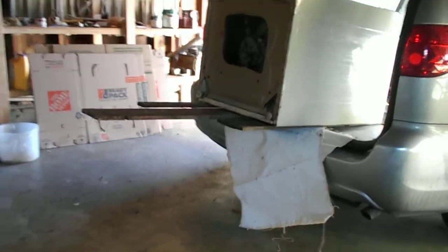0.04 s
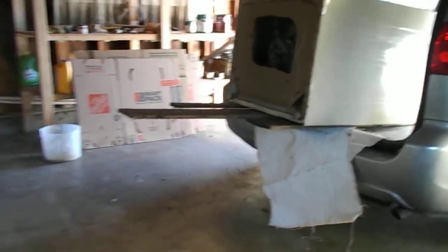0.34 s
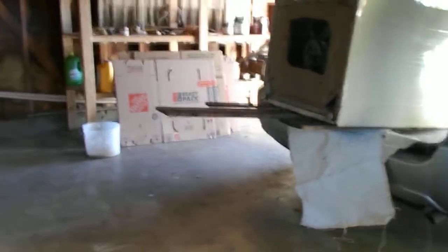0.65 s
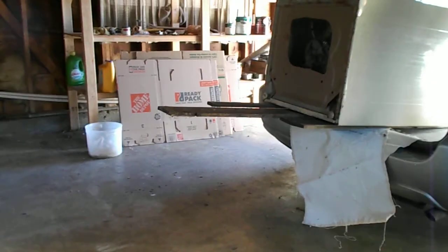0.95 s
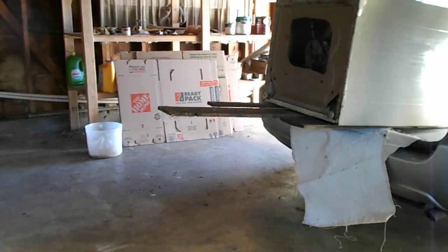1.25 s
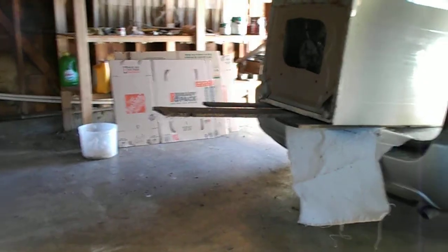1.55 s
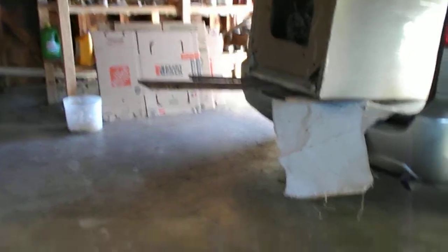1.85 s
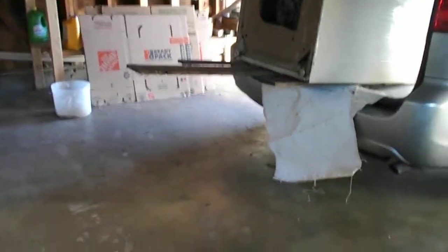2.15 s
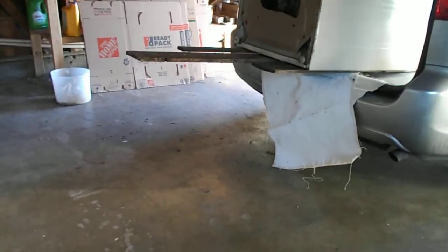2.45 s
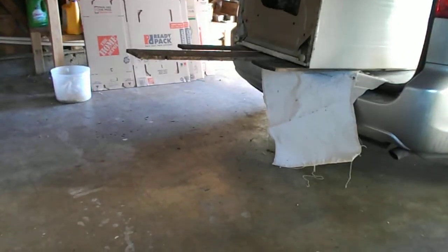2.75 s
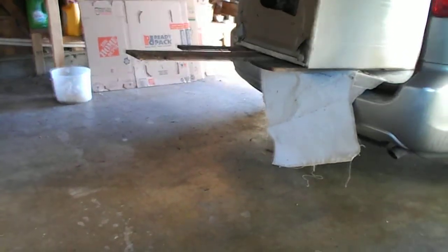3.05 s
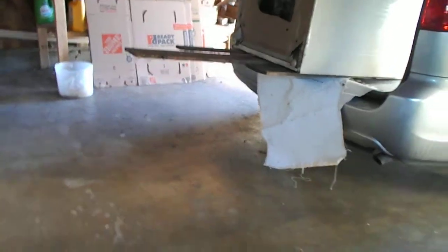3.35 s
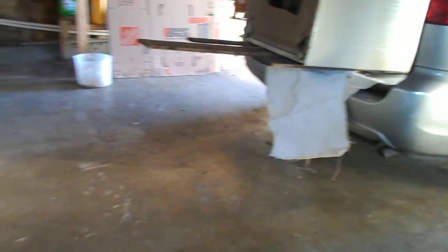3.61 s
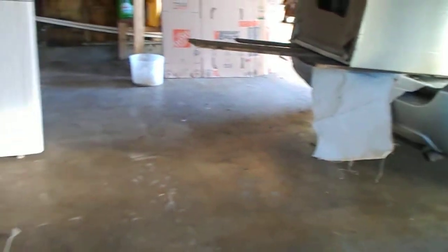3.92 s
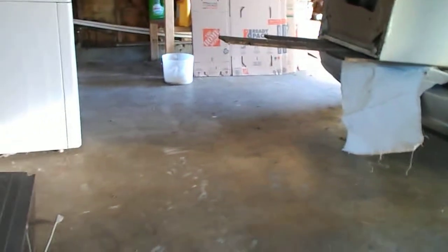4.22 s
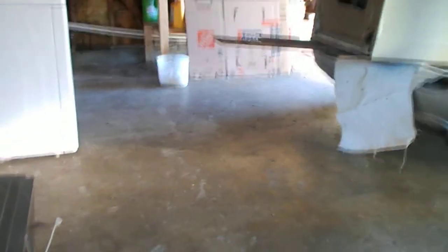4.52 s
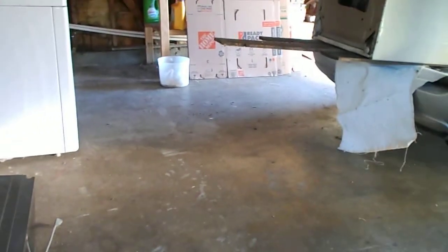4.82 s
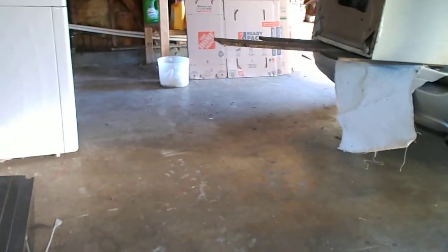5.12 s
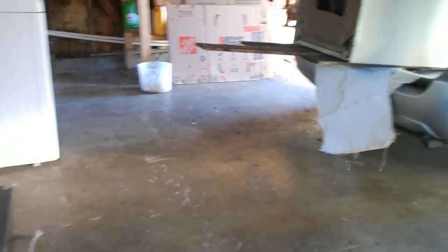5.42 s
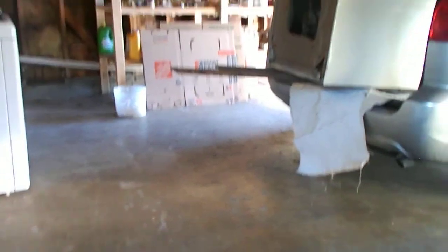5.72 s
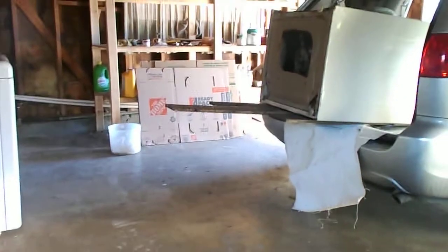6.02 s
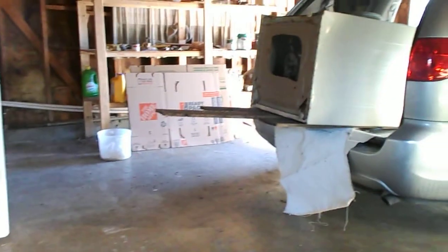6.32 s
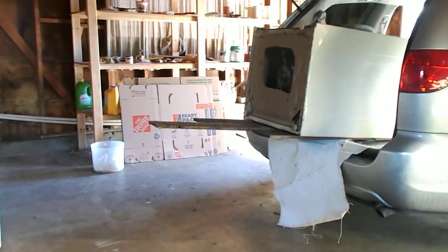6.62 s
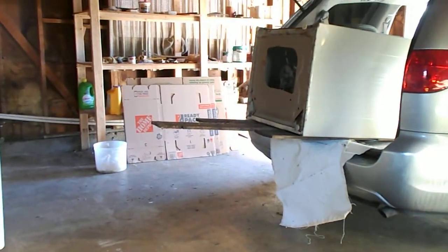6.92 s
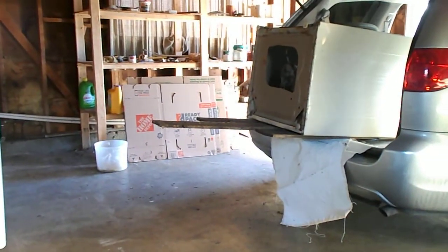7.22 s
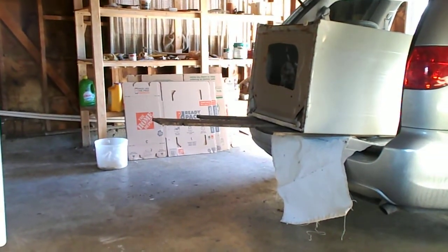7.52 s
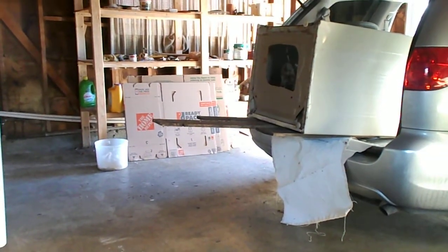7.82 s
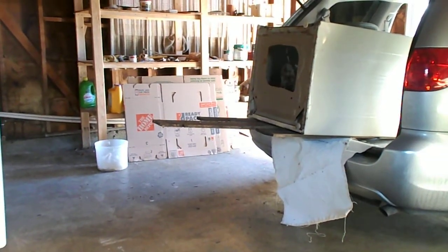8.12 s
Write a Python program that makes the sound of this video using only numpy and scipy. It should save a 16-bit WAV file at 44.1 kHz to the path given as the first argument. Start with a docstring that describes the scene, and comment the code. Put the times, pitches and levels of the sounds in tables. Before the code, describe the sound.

Close handling noise on a camera in a quiet garage: creaky rubs, sharp plastic clicks and low thuds, thinning to faint ticks and hiss.

```python
"""A small camera is carried through a quiet garage, over room air and microphone hiss.
From the start fingers stick and slip on its plastic case in creaky rubs, and the case clicks.
Near 0.7 s low thuds lie under the hardest clicks, loose parts rattle and a small spring rings faintly.
Light slides of skin and sparse clicks follow, then more rubs and, near 4.5 s, two more thudding clicks.
Near 5.6 s the hand rests and a faint hiss, perhaps a motor, fades; slides, ticks and soft bumps remain."""
import sys
import numpy as np
from scipy import signal
from scipy.fft import rfft, irfft, next_fast_len
from scipy.io import wavfile

SR = 44100
rng = np.random.default_rng(int(sys.argv[2]) if len(sys.argv) > 2 else 0)


def output_pcm(signal):
    """Save a mono or channel-first signal as 16-bit PCM at the path in sys.argv[1].

    Samples are clipped to [-1, 1] before scaling.
    """
    pcm = np.clip(np.atleast_2d(signal).T, -1, 1) * 32767
    wavfile.write(sys.argv[1], SR, np.round(pcm).astype(np.int16))


N = 359716
TIME = np.arange(N) / SR


# impacts on the case: (time [s], level [dB], relative knock below 2 kHz [dB])
CLICKS = [(0.044, -29, 2.5), (0.1454, -41, -9.5), (.22, -44.5, -19), (.3299, -34.5, -11),
          (0.4394, -26.5, -5), (0.5117, -34, -17.5), (0.57, -25.5, -2.5), (0.6633, -11, -24),
          (0.6813, -18, -8.5), (0.692, -16.5, -27.5), (.721, -21.5, -28), (0.725, -16, -13),
          (0.7344, -19.5, -31), (0.7926, -11, -20), (0.8038, -17, -38.5), (0.8457, -24.5, -29),
          (1.3962, -32.5, -9.5), (1.6611, -32, -8.5), (1.6868, -23, -8.5), (1.6992, -14, -5.5),
          (1.7824, -28.5, -27), (1.8785, -32.5, -9), (2.0424, -38.5, -22), (2.24, -38, -18),
          (2.3457, -39.5, -7), (2.3877, -37.5, -14), (2.7647, -38, -9.5), (2.8736, -37, -19),
          (3.0359, -16.5, -32.5), (3.105, -32, -2.5), (3.1337, -12.5, -25.5), (3.1866, -31, -12),
          (3.6397, -34.5, -26), (3.8272, -31.5, -33), (4.1738, -28.5, -28.5), (4.2167, -25.5, -34),
          (4.351, -21.5, -3), (4.3835, -22, -30), (4.4221, -8.5, -15), (4.4468, -16, -45.5),
          (4.5515, -22.5, -31), (4.5916, -10.5, -26.5), (4.6413, -24, -36.5), (5.1139, -44, -37.5),
          (5.1698, -30, -11), (5.226, -23.5, -12.5), (5.3562, -13, -19.5), (5.403, -30.5, -4.5),
          (5.485, -37, -4.5), (5.5294, -39.5, -3), (6.1641, -46, -14), (6.3067, -46.5, -11),
          (6.6481, -49, -1.5), (7.5147, -35.5, -19.5), (7.6171, -45.5, -19.5), (7.7276, -51.5, -25.5),
          (7.9972, -50.5, -27)]

def clicks(chatter_s=0.002, damping_s=0.017, size=200):
    """Impact excitation: plastic strikes plastic, chatters briefly and sets the case modes ringing."""
    out, modes = np.zeros(N), case_modes()
    modes = modes * np.exp(-TIME[:modes.shape[1]] / damping_s)   # the pressing finger damps the shell
    for s, db, knock_db in CLICKS + rattles() + ticks():
        force = 0.15 * rng.standard_normal(size) * np.exp(-TIME[:size] / chatter_s)
        force[0] += 1
        sound = through_case(force, modes, vary_db=3.5)
        knock = cut(cut(sound, "low", 1967, order=6), "high", 170)
        body = cut(sound, "band", [min(1600 - 19 * knock_db, 2800), 3800], order=4)
        snap = cut(cut(sound, "high", 4100, order=4), "low", 11000, order=6)
        snap_db = -19 - 0.44 * knock_db + 0.14 * db   # sharper with less knock and with more force
        add(out, s, from_db(db) * blend([(knock, knock_db), (body, 0), (snap, snap_db)], size))
    return out


# finger strokes: (start [s], end [s], nominal level [dB], depth weight [dB], rasp weight [dB])
RUBS = [(0, 0.03, -35.5, -6, -7.5), (0.033, 0.066, -35.5, -10, -6), (0.106, .13, -54, 9, -20),
        (0.242, 0.33, -31, -9, -12), (0.398, 0.425, -32.5, -11, -8.5), (0.434, .452, -22.5, -13.5, -0.5),
        (.454, 0.501, -31, -8.5, -9.5), (.557, 0.646, -34.5, -1.5, -9.5), (0.657, 0.782, -32.5, -2.5, -4.5),
        (0.79, 0.864, -43.5, 2, 6), (0.911, 0.951, -40.5, -21, 1), (1.12, 1.138, -51, -7.5, -10),
        (1.179, 1.202, -55, -14, -6), (1.401, 1.421, -45, -7, 3), (2.069, 2.087, -47, -18, 3.5),
        (2.386, 2.44, -56, -5, 2), (2.767, 2.99, -54, -6.5, -9), (3.001, 3.049, -37.5, -9.5, 2.5),
        (3.053, 3.083, -31.5, -10.5, -0.5), (3.12, 3.14, -26, -12.5, -10), (3.165, 3.222, -31, -4, -9.5),
        (3.27, 3.303, -38, -8, -8.5), (3.425, 3.47, -26.5, -15, -5.5), (3.485, 3.541, -26, -16.5, -7),
        (3.546, 3.577, -23.5, -24, -6.5), (3.794, 3.905, -29.5, -13, -6.5), (3.911, 3.932, -27.5, -15, -1),
        (3.998, 4.021, -57.5, 10, -10), (4.094, 4.2, -33, -12, -10.5), (4.262, 4.337, -38, -3, -8),
        (4.342, 4.405, -33, -3, 0.5), (4.419, 4.483, -41, 2, 3.5), (4.519, 4.56, -44, -0.5, 8),
        (4.598, 4.652, -45.5, -4, 8), (7.229, 7.244, -57, -16, -5)]

def rubs():
    """Friction on the case: finger strokes, a skid after each click, a creak before each loud thud."""
    out = np.zeros(N)
    for start, end, db, depth_db, rasp_db in RUBS:
        add(out, start, rub(end - start, db, depth_db, rasp_db))
    for s, db, knock_db in CLICKS:
        add(out, s, rub(0.016, db + knock_db - 10, depth_db=-8.5, rasp_db=3.5))
    for s, db, _ in THUDS:
        if db > LOUD_THUD_DB:
            add(out, s - 0.004, rub(0.004, db=-21.5, depth_db=-13.5, rasp_db=5))
    return out


def rub(length_s, db, depth_db, rasp_db, rise_s=0.002, fall_s=0.008, sag_db=5.5, depth_hz=550):
    """Stick-slip friction: a fingertip catches, stutters and eases off; soft skin dulls each slip."""
    t = TIME[:int(length_s * SR)]
    pressure = np.minimum(1, t / rise_s + 0.3) * np.minimum(1, (length_s - t) / fall_s + 0.38)
    easing = from_db(1.95 * waver(t, per_s=133.3, size=64) - sag_db * t / length_s)
    force = pressure * easing * slips(len(t), per_s=1500, spread_db=3.5)
    shell = through_case(force, case_modes(), vary_db=2.5)
    grit = from_db(-27) * shell
    sound = cut(cut(shell, "low", 3400, order=7) + grit, "high", 80)
    # the way the finger lies sets the balance of the three bands
    depth = cut(sound, "low", depth_hz, order=4)
    body = cut(sound, "band", [0.93 * depth_hz, 2200], order=4)
    rasp = cut(sound, "high", 2130, order=4)
    bands = [(depth, depth_db), (body, 0), (rasp, rasp_db + 1.5)]
    return from_db(db - 1.5) * rms(easing) * blend(bands, len(t))


# resonances of the plastic case: (frequency [Hz], bandwidth [Hz], relative gain [dB])
CASE_MODES = [(118, 56, -22), (244, 45, -9.5), (323.5, 56, -8), (433.4, 90, -6.5), (684, 58, -2.5),
              (791, 132, -2.5), (1010, 94, -1.5), (1208, 70, 5), (1351, 266, -1), (1667, 70, 1.5),
              (1798, 72, -2.5), (2213, 152, -6.5), (2430, 260, -4.5), (3080, 353, 5.5), (3334, 323, 3.5),
              (4080, 260, 1.5), (4575, 720, 0), (5467, 744, 1), (6350, 320, -4), (7080, 900, -11.5),
              (9560, 1400, -16.5)]

def case_modes(size=3000):
    """Normal modes: one damped sinusoid per row, dying faster the wider its bandwidth."""
    hz, width_hz, db = np.transpose(CASE_MODES)[:, :, None]
    t = TIME[:size]
    return from_db(db) * width_hz * np.exp(-np.pi * width_hz * t) * np.cos(2 * np.pi * hz * t)


def through_case(force, modes, vary_db):
    """Modal superposition: each point of contact drives the modes with strengths of its own."""
    strengths = from_db(vary_db * rng.standard_normal(len(modes))) * (-1) ** np.arange(len(modes))
    return signal.fftconvolve(force, strengths @ modes)


# low thuds under the hardest clicks, and a few soft bumps: (time [s], level [dB], frequency [Hz])
THUDS = [(.663, -41, 110), (.793, -34, 101), (3.135, -53.5, 95), (4.423, -32, 121), (4.591, -37, 112),
         (5.617, -53, 300), (6.675, -63, 260), (7.189, -66, 210), (7.24, -58, 232), (7.91, -59, 283)]
LOUD_THUD_DB = -49   # a thud above this level comes with a creak and a rattle

def thuds(thud_t60_s=0.031, boom_hz=84, boom_t60_s=0.82):
    """Damped sinusoids: thud and faint boom under the hardest clicks, likely overload, and soft bumps."""
    out, t = np.zeros(N), TIME[:SR]
    for s, db, hz in THUDS:
        thud = cut(np.sin(2 * np.pi * hz * t) * decay(t, thud_t60_s), "high", 0.5 * hz)
        boom = from_db(db + 6) * np.sin(2 * np.pi * boom_hz * t) * decay(t, boom_t60_s)
        add(out, s, from_db(db) * (thud + boom))
    return out


def rattles(count=5, bounce_s=0.0098, loss_db=2.5, knock_db=-33):
    """Inelastic collisions: loose parts bounce ever weaker after the hardest clicks; rows as in CLICKS."""
    rows = []
    for s, db, _ in THUDS:
        scatter = rng.standard_normal((count, 2))
        if db > LOUD_THUD_DB:
            for k, (late, hard) in enumerate(scatter):
                delay_s = bounce_s * (k + 1 + 0.15 * late)
                rows.append((s + delay_s, -24.5 - loss_db * k + 4.5 * hard, knock_db))
    return rows


# light slides of the hand: (start [s], end [s], level [dB])
SLIDES = [(0.045, 0.239, -55.5), (0.862, 0.963, -47), (0.944, 1.033, -39.5), (1.375, 1.679, -47.5),
          (1.74, 1.978, -48.5), (2.135, 2.474, -54), (2.713, 3.02, -49.5), (4.72, 5.06, -59),
          (5.147, 5.284, -48), (5.606, 5.89, -48.5), (5.878, 6.098, -50), (6.37, 6.6, -60.5),
          (7.16, 7.213, -51), (7.767, 7.975, -64.5)]
# spectrum of skin sliding on plastic: (frequency [Hz], relative spectral density [dB])
SLIDE_SPECTRUM = [(100, -56), (250, -30.5), (700, -20), (1400, -12.5), (1720, -0.5), (2000, -22),
                  (2500, -8.5), (2800, -6.5), (3180, 7), (3800, -10), (4400, -8.5), (5100, -18),
                  (6400, -17.5), (7100, -35.5)]

def slides(waver_db=5.0):
    """Sliding friction: dry skin hisses over the shell, swelling and fading with the stroke's speed."""
    speed = np.zeros(N)
    for start, end, db in SLIDES:
        phase = np.linspace(0, np.pi, int((end - start) * SR))
        add(speed, start, from_db(db) * np.abs(np.sin(phase)) ** 0.8)
    flicker = from_db(waver_db * waver(TIME, per_s=45, size=1000))
    return speed * flicker * coloured(slips(N, per_s=3500, spread_db=3.5), SLIDE_SPECTRUM)


def ticks(per_slide=4, spread_db=2.5, knock_db=-20.5):
    """Asperity contact: sliding skin catches, and a grain ticks under each rub; rows as in CLICKS."""
    catches = [(start, end, db - 3) for start, end, db in SLIDES for _ in range(per_slide)]
    grains = [(start, end, db - 7.5) for start, end, db, _, _ in RUBS]
    return [(start + (end - start) * rng.random(), db + spread_db * rng.standard_normal(), knock_db)
            for start, end, db in catches + grains]


# modes of the small spring inside: (frequency [Hz], relative gain [dB], 60 dB decay time [s])
SPRING_MODES = [(2842, -60.5, .6), (3060, -65, 1.1), (4323, -59, .6), (5055, -47.5, .4), (5170, -51, .34),
                (7500, -47.5, .5)]

def spring(shake, coupling_db=-26.5):
    """Sympathetic resonance: a light metal part, shaken by the case, rings on after it."""
    out = np.zeros(N)
    for hz, db, t60_s in SPRING_MODES:
        radius, angle = decay(1 / SR, t60_s), 2 * np.pi * hz / SR
        feedback = [1, -2 * radius * np.cos(angle), radius ** 2]
        out += from_db(db + coupling_db) * signal.lfilter([0, np.sin(angle)], feedback, shake + 1e-18)
    return out


# rumble of the grip: (frequency [Hz], relative spectral density [dB])
GRIP_SPECTRUM = [(30, -33), (55, -16.5), (85, -3), (135, -14.5), (250, 8.5), (450, 7), (900, -5),
                 (2000, -8), (4000, -41.5)]

def grip(rubbing, settle_s=(5.53, 5.7), release_s=0.055):
    """Friction noise: the grip rumbles until the hand rests, and swells with each rub."""
    carried = np.interp(TIME, settle_s, [1, 0])
    pole = np.exp(-1 / (release_s * SR))
    effort = signal.lfilter([1 - pole], [1, -pole], np.abs(rubbing) + 1e-18)
    gain = from_db(-82) * carried + from_db(-16.5) * effort
    return gain * coloured(slips(N, per_s=900, spread_db=6.0), GRIP_SPECTRUM)


# faint hiss, strongest near 3 kHz: (frequency [Hz], relative spectral density [dB])
HISS_SPECTRUM = [(300, -27.5), (560, -25.5), (660, -9.5), (1200, -10.5), (2100, -12.5), (2600, -10.5),
                 (2980, -2), (3300, -8.5), (4000, -20.5), (6000, -27.5), (11000, -33)]

def faint_hiss(fade_s=(5.53, 5.7), levels_db=(-59.5, -75.5)):
    """Filtered noise: a faint steady hiss, perhaps a small camera motor, fades near 5.6 s."""
    return from_db(np.interp(TIME, fade_s, levels_db)) * coloured(rng.standard_normal(N), HISS_SPECTRUM)


def garage(x, t60_s=0.36, build_s=0.0095, wall_hz=3200, size=30000):
    """Reverberation: reflections from wooden walls and a concrete floor merge into a dull tail."""
    t = TIME[:size]
    tail = rng.standard_normal(size) * decay(t, t60_s) * np.minimum(1, t / build_s)
    tail /= rms(tail) * np.sqrt(size)   # unit energy
    return cut(signal.fftconvolve(x, tail)[:N], "low", wall_hz, order=1)


# room air and microphone hiss: (frequency [Hz], relative spectral density [dB])
AIR_SPECTRUM = [(29, -75.5), (50, -56), (108, -19), (271, -17.5), (461, -9.5), (646, -6), (765, -5.5),
                (1100, -7.5), (3850, -15.5), (10900, -16.5), (12600, -37), (16000, -38)]

def air(level_db=-67):
    """Stationary broadband noise: room air and microphone hiss form a steady floor."""
    return from_db(level_db) * coloured(rng.standard_normal(N), AIR_SPECTRUM)


def from_db(db):
    """Amplitude ratio of a level in decibels."""
    return 10 ** (np.asarray(db) / 20)


def rms(x):
    """Root-mean-square amplitude."""
    return np.sqrt(np.mean(x ** 2) + 1e-20)


def decay(t, t60_s):
    """Exponential decay by 60 dB in t60_s."""
    return np.exp(-np.log(1000) * t / t60_s)


def cut(x, kind, edge_hz, order=2):
    """Butterworth low-, high- or band-pass."""
    return signal.sosfilt(signal.butter(order, edge_hz, kind, fs=SR, output="sos"), x)


def add(track, s, sound):
    """Superposition: mix a sound into the track at s seconds."""
    at = int(s * SR)
    track[at:at + len(sound)] += sound[:max(N - at, 0)]


def blend(parts, size):
    """Sum (sound, dB) pairs, each with the energy of that level held for size samples."""
    return sum(from_db(db) * part * np.sqrt(size / (np.sum(part ** 2) + 1e-20)) for part, db in parts)


def coloured(x, spectrum):
    """Spectral shaping of a steady sound, scaled to unit rms."""
    hz, db = np.transpose(spectrum)
    size = next_fast_len(N)
    bins_hz = np.maximum(np.fft.rfftfreq(size, 1 / SR), 1)
    gain = from_db(np.interp(np.log(bins_hz), np.log(hz), db))
    out = irfft(rfft(x, size) * gain, size)[:N]
    return out / rms(out)


def slips(size, per_s, spread_db):
    """Poisson impulse train: tiny stick-slip releases of uneven size."""
    impulses = (rng.random(size) < per_s / SR) * rng.choice([-1, 1], size)
    return impulses * from_db(spread_db * rng.standard_normal(size))


def waver(t, per_s, size):
    """Random modulation: straight lines join per_s random values a second."""
    return np.interp(t * per_s, np.arange(size), rng.standard_normal(size))


def scene():
    """Two transmission paths: handling reaches the microphone through the case, faintly via the room."""
    rubbing, clicking = rubs(), clicks()
    room = from_db(-19) * garage(rubbing) + from_db(-27) * garage(clicking)
    background = room + air()
    close = clicking + rubbing + thuds() + slides() + spring(clicking) + faint_hiss() + grip(rubbing)
    return (close + background)[None]


def record(dry, mic_top_hz=11200, overload=0.76, floor_db=-94):
    """Saturation: the microphone lacks the top octave, but the hardest clicks overload and spill into it."""
    heard = signal.sosfilt(signal.ellip(8, 0.5, 60, mic_top_hz, fs=SR, output="sos"), dry)
    rounded = heard / (1 + (heard / overload) ** 12) ** (1 / 12)
    return cut(rounded + from_db(floor_db) * rng.standard_normal(N), "low", 16300, order=16)


dry = scene()
out = record(dry)
output_pcm(out)
```